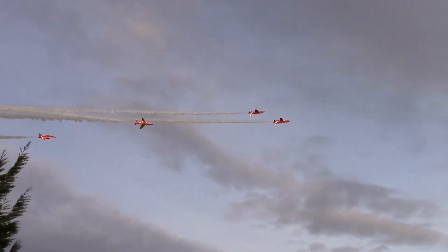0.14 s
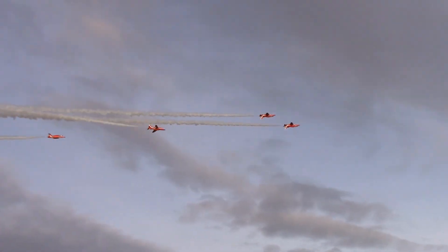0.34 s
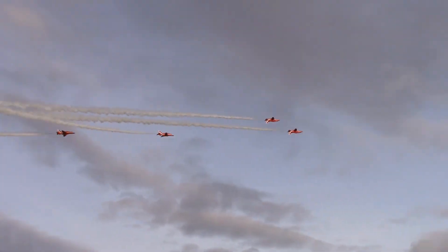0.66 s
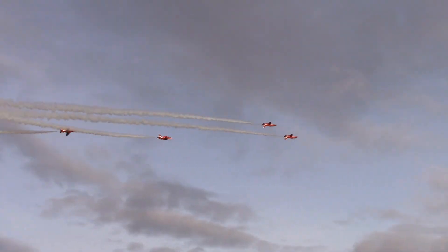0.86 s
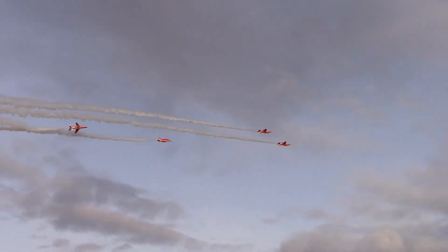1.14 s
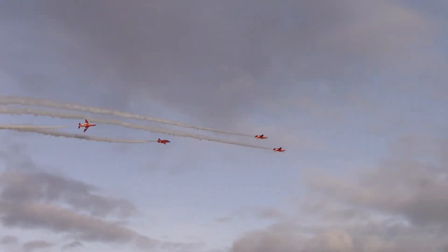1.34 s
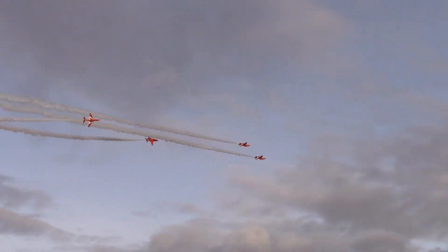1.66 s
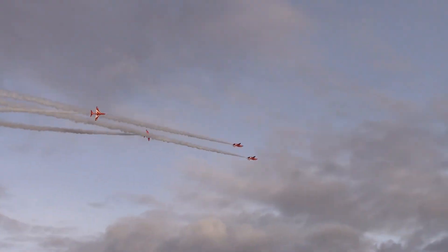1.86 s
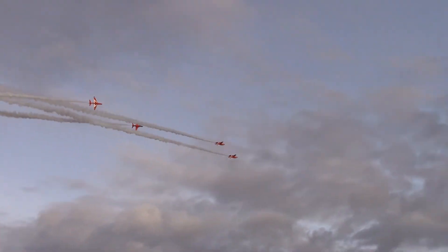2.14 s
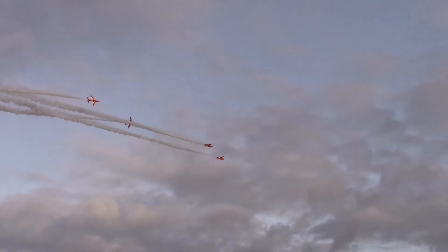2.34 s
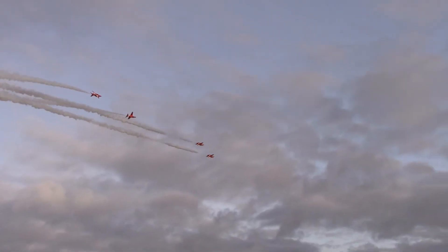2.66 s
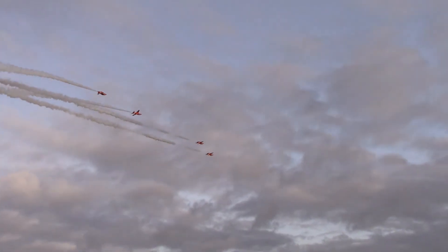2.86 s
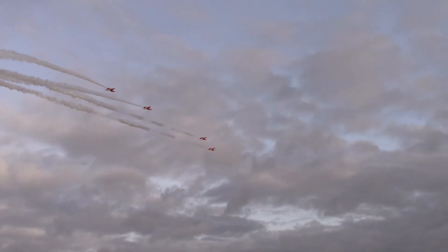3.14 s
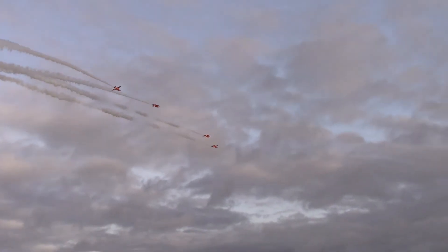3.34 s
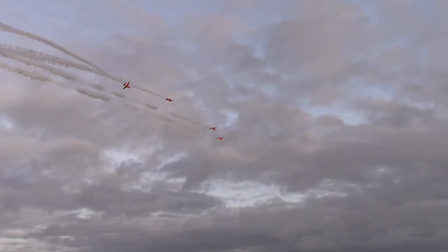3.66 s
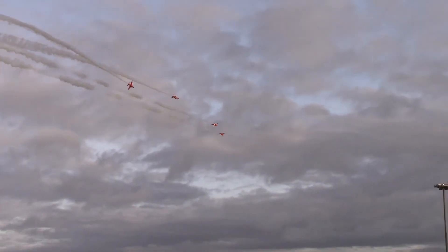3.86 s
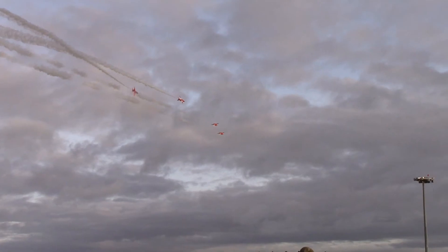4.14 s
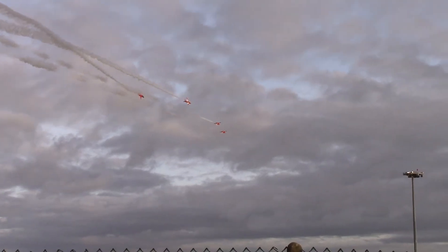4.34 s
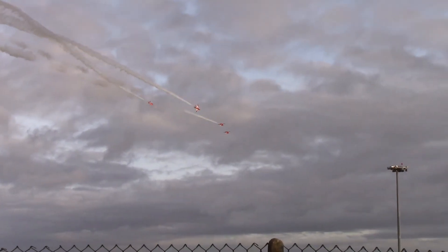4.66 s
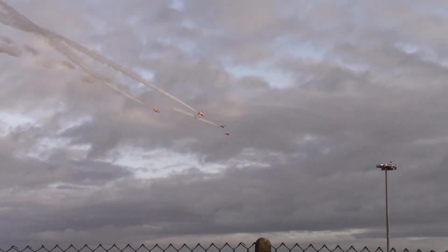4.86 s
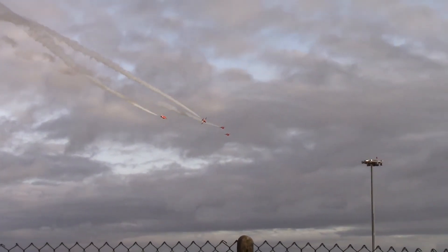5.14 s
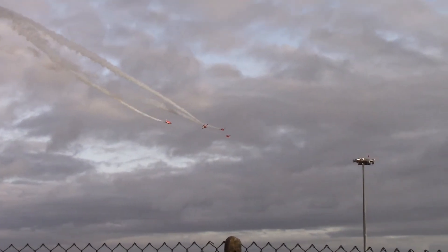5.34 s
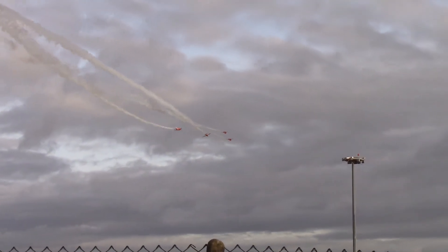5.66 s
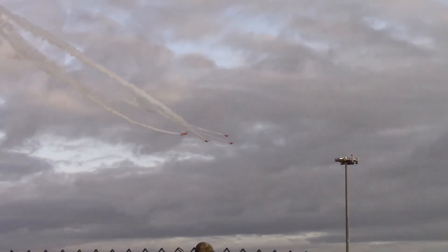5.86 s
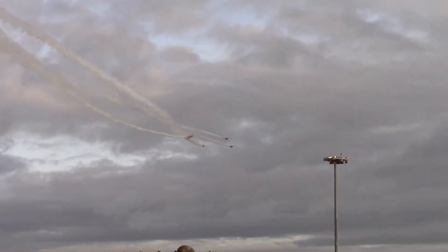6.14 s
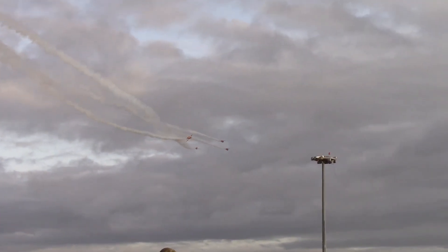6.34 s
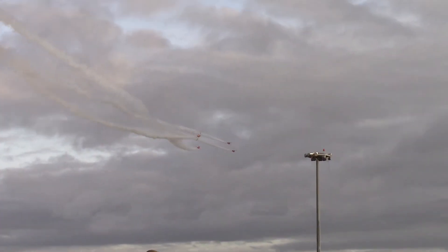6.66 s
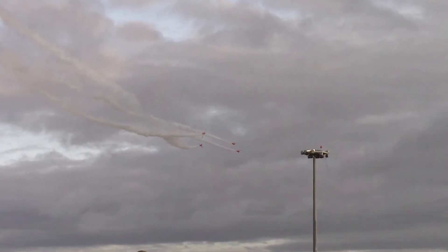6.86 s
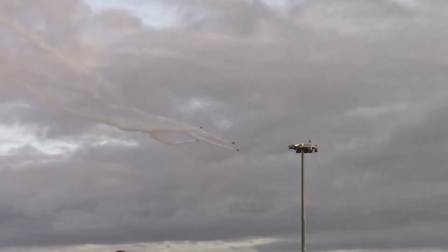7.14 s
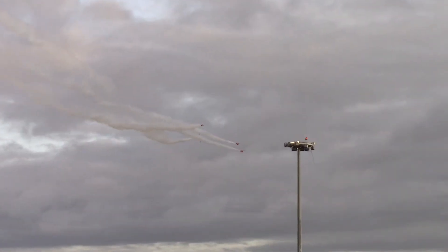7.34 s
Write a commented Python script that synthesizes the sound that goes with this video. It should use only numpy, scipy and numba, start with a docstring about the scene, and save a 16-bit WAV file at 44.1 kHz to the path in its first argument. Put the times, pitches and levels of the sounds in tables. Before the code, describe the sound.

Four small jets roar past in formation outdoors, a gritty tearing rush that swells unevenly, peaks early, then recedes with a hollow sweep.

```python
"""Four small jets in formation, heard as one exhaust roar, fly past low over open ground and recede. The roar
is noise in quarter-octave bands, with shocks, flickering as through turbulent air. A narrow band near 3.3 kHz
stands out of the hiss; faint delayed copies of the treble streak it. The ground returns an echo whose lag
shrinks overall, so the comb notches climb. A small microphone with little bass and a dull top picks it up, with
a grit that follows the upper mids."""
import sys
import numpy as np
from scipy import signal
from scipy.io import wavfile
from scipy.ndimage import uniform_filter1d, map_coordinates
from numba import njit

SR = 44100
rng = np.random.default_rng(int(sys.argv[2]) if len(sys.argv) > 2 else 0)


def master_out(mix):
    """Clip the mix to full scale and print it as 16-bit PCM to the path in sys.argv[1]."""
    frames = np.transpose(np.atleast_2d(mix))
    ceiling = np.clip(frames, -1, 1)
    pcm = np.round(ceiling * 32767).astype(np.int16)
    wavfile.write(sys.argv[1], SR, pcm)


N = 331000  # samples


def from_db(db):
    """Decibel law: amplitude gain of a level in dB."""
    return 10 ** (np.asarray(db) / 20)


def rms_one(x):
    """Normalisation of mean power: scaled to rms 1."""
    return x / np.sqrt(np.mean(x ** 2) + 1e-20)


def in_time(rows):
    """Linear interpolation: the columns of a curve table after t/s, sample by sample."""
    t, *columns = np.transpose(rows)
    return np.array([np.interp(np.arange(N) / SR, t, column) for column in columns])


def drift(rate_hz):
    """Low-passed random process: noise at every 40th sample through two equal one-poles, rms 1."""
    step = 40
    r = np.exp(-2 * np.pi * rate_hz * step / SR)
    noise = rng.standard_normal(N // step + 2002)
    slow = signal.lfilter([1], [1, -2 * r, r * r], noise)[2000:]  # drop the filter's start
    return np.interp(np.arange(N) / step, np.arange(len(slow)), rms_one(slow))


def pole_radius(width_hz):
    """Damping of a resonance: a wider band has poles further inside the unit circle."""
    return np.exp(-np.pi * width_hz / SR)


@njit
def moving_band(x, hz, r, sr):
    """Two-pole resonance of gain 1 at its centre, which follows hz."""
    y = np.zeros(len(x))
    for i in range(2, len(x)):
        drive = (1 - r * r) / 2 * (x[i] - x[i - 2])
        y[i] = drive + 2 * r * np.cos(2 * np.pi * hz[i] / sr) * y[i - 1] - r * r * y[i - 2]
    return y


# Ground reflection; depth is that of the hollow at the second notch before turbulence varies it.
# Columns: t/s, lag/ms, strength/1 (0-1), depth/1 (0-1)
GROUND_REFLECTION = [(0, 1.68, .3, .05), (1, 1.62, .3, .1), (1.6, 1.85, .3, .4), (2, 1.85, .35, .4),
                     (2.4, 1.62, .35, .2), (3, 1.56, .35, .15), (3.6, 1.5, .35, .25), (4.05, 1.32, .35, .5),
                     (4.25, 1.56, .45, .8), (4.42, 1.56, .45, .4), (4.62, 1.6, .5, .85), (5, 1.53, .5, .9),
                     (5.2, 1.47, .5, .7), (5.4, 1.28, .5, .85), (5.6, 1.25, .45, .95), (5.9, 1.24, .4, .7),
                     (6.2, 1.24, .35, .95), (6.6, 1.21, .3, .9), (6.8, 1.25, .25, .45), (7.5, 1.25, .2, .2)]
# Second, higher hollow in the roar, climbing overall as the jets sink.
# Columns: t/s, f/Hz, depth/1 (0-1)
HIGHER_HOLLOW = [(0, 1580, 0.2), (1, 1600, 0.3), (2, 1500, 0.3), (2.9, 1500, 0), (3.5, 1716, .4),
                 (4, 1844, 0.4), (4.3, 1754, .4), (4.75, 1700, 0.5), (5.2, 1775, .5), (5.45, 1900, .8),
                 (5.75, 1925, 0.6), (5.9, 2155, .2), (6.05, 2170, 0.6), (6.5, 2125, 0.3), (7.5, 2150, 0)]
ECHO_DULL_HZ = 1160
LATE_LAG_MS, LATE_STRENGTH = 3.2, 0.14
HOLLOW_WIDTH_HZ, UPPER_WIDTH_HZ = 90, 97


def ground_echo(x):
    """Interference of direct and reflected sound: a comb whose notches climb as the lag shrinks."""
    lag_ms, strength, depth = in_time(GROUND_REFLECTION)
    b, a = signal.butter(1, ECHO_DULL_HZ, fs=SR)
    dull = signal.filtfilt(b, a, x)  # rough grass scatters the highs
    arrival = np.arange(N) - lag_ms * SR / 1000
    first = map_coordinates(dull, [arrival], order=3, mode="mirror")
    late = np.roll(dull, round(LATE_LAG_MS * SR / 1000))  # subtracted: a weak inverted echo
    combed = (x + strength * first - LATE_STRENGTH * late) / np.sqrt(1 + strength ** 2)

    # turbulence fills the hollow now and then
    depth = np.clip(depth * (.68 + .4 * drift(5.)), 0, .98)
    # one and a half cycles of lag: the sharpest cancelling
    notch_hz = (1 + .012 * drift(2.5)) * 1500 / lag_ms
    for _ in range(2):  # twice over, for a dark floor
        combed = combed - depth * moving_band(combed, notch_hz, pole_radius(HOLLOW_WIDTH_HZ), SR)

    upper_hz, upper_depth = in_time(HIGHER_HOLLOW)
    upper = moving_band(combed, upper_hz, pole_radius(UPPER_WIDTH_HZ), SR)
    return combed - np.clip(upper_depth, 0, .95) * upper


STRAY_LAG_MS, STRAY_ABOVE_HZ = (2.9, 4.7, 7.3), 1800
STRAY_WANDER, STRAY_STRENGTH = .05, .13  # rms share of the lag; rms gain of each path


def stray_path(x):
    """Multipath refraction: treble by weak bent paths of wandering lag and strength streaks the hiss."""
    b, a = signal.butter(2, STRAY_ABOVE_HZ, "high", fs=SR)
    treble = signal.filtfilt(b, a, x)
    for lag_ms in STRAY_LAG_MS:
        lag = lag_ms * SR / 1000 * (1 + STRAY_WANDER * drift(1.))
        delayed = np.interp(np.arange(N) - lag, np.arange(N), treble)
        x = x + STRAY_STRENGTH * drift(3.) * delayed
    return x


# Narrow band near 3.3 kHz standing out of the hiss. Columns: t/s, level/dB (lift at its centre)
LIFTED_BAND = [(0, 4), (1.5, 2.5), (2.5, 2), (4, 3.5), (5.5, 2.5), (7.5, 4)]
LIFTED_HZ, LIFTED_WIDTH_HZ = 3270, 350


def lifted_band(x):
    """Resonant emphasis: lifts a narrow band of the hiss whose centre wanders."""
    centre_hz = LIFTED_HZ * (1 + 0.051 * drift(3.))
    band = moving_band(x, centre_hz, pole_radius(LIFTED_WIDTH_HZ), SR)
    return x + (from_db(in_time(LIFTED_BAND)[0]) - 1) * band


CRACKLES_PER_S = 60
CRACKLE_DB = 13.5  # smallest spike, over noise of rms 1


def crackle():
    """Poisson-like shock train: pressure spikes at random moments, of uneven size."""
    born = rng.random(N) < CRACKLES_PER_S / SR
    excess_db = 2.6 * np.minimum(rng.exponential(1, N), 4)
    return born * from_db(CRACKLE_DB + excess_db)


def eddies(spread_db, rate_hz, shocks):
    """Turbulent mixing noise: its strength jumps as large eddies burst, with lone shocks on it."""
    return rng.standard_normal(N) * from_db(spread_db * drift(rate_hz)) + shocks


# Momentary flares (+) and sags (-) of a stretch of the roar; widths are from centre to 1/e^2 of the dB.
# Columns: t/s, f/Hz (centre), width/octave, width/s, level/dB
BAND_FLARES = [(0.194, 4930, 0.46, 0.34, -7), (.52, 321, 0.33, 0.27, 4), (0.653, 3410, .2, 0.089, 6),
               (1.7, 3100, 0.11, 0.13, 4.5), (1.4, 2480, .2, 0.047, 2.5), (1.645, 260, 0.41, 0.16, 3),
               (1.77, 520, .5, .12, 2.5), (1.45, 420, .5, .2, -3), (3.75, 650, .5, .12, -2),
               (4.42, 650, .5, .15, -1.5), (5.1, 720, .5, .1, -1.5), (.8, 190, .6, 0.91, -2),
               (1.868, 640, .4, 0.041, 4), (2.345, 1100, 0.56, 0.09, 5), (2.77, 1500, .8, 0.12, 2),
               (2.578, 5050, 0.39, .1, 7), (2.682, 540, .3, 0.089, 3.5), (2.897, 4670, 0.22, 0.46, 5),
               (3.411, 1417, 0.39, 0.15, 5), (3.88, 1520, .25, .08, 6.5), (4.004, 291, .3, 0.11, 5),
               (4.5, 1515, .25, 0.1, 4), (4.575, 467, 0.27, 0.074, 4.5), (4.143, 450, 0.3, 0.13, 5.5),
               (4.734, 1400, .3, 0.099, 8), (4.76, 2230, 0.19, 0.035, 8), (5.225, 782, 0.25, .08, 9),
               (5.64, 249, .3, .06, 5), (4.68, 720, .4, .07, 2.5), (5.4, 2370, 0.092, 1.2, 2),
               (6.8, 299, .25, .12, 5.5), (6.844, 550, 0.26, 0.42, -11), (6.295, 570, 0.5, 0.08, 4.5),
               (5.6, 950, .5, .03, 4), (5.92, 720, .3, .07, 3.5), (6.782, 790, 0.37, 0.071, 7),
               (6.894, 281, 0.34, 0.15, 6.5), (6.1, 3400, 0.55, 0.9, 2.5), (1.7, 4000, .5, .15, 2.5),
               (1.55, 2300, .3, 0.092, 3.5), (3.58, 1800, 1.2, 0.11, -2.5), (1.59, 500, .4, .05, 3.5),
               (2.655, 560, .5, .04, 2.5), (6.8, 4860, 0.36, .7, -7), (7.2, 786, 0.28, 0.36, 2),
               (7.072, 810, 0.54, 0.063, 4), (7.21, 1980, 0.37, 0.054, 5.5), (7.239, 745, 0.32, 0.062, 4)]


def flares_db(hz):
    """Local spectral gain: the flares at one pitch, each a bell in time and in octaves."""
    coarse_s = np.arange(0, N, 100) / SR
    t, centre_hz, octaves, length_s, db = np.transpose(BAND_FLARES)[:, :, None]
    in_pitch = (np.log2(hz / centre_hz) / octaves) ** 2
    in_moment = ((coarse_s - t) / length_s) ** 2
    bells = db * np.exp(-2 * in_pitch - 2 * in_moment)
    return np.interp(np.arange(N) / SR, coarse_s, bells.sum(axis=0))


# The rumble, growing as the tailpipes turn toward the listener; only its changes against the roar count.
# Columns: t/s, level/dB
RUMBLE_CURVE = [(0.03, -58), (0.28, -55.5), (2.73, -42.5), (2.77, -45.5), (3.53, -39), (3.6, -44),
                (3.89, -37), (4.57, -42), (4.63, -35.5), (4.88, -33.5), (5.01, -45), (5.16, -37.5),
                (5.59, -44.5), (5.61, -41), (6.5, -36), (6.59, -41), (6.96, -32), (7.04, -40.5),
                (7.15, -34.5), (7.48, -36.5)]
# Upper half of the roar's body over its lower half; only departures from the mean count.
# Columns: t/s, level/dB
LEAN_CURVE = [(0, -1.5), (.8, -1), (1.301, -3), (1.7, -6), (2.1, -4), (2.45, -1.5), (2.7, -0.5), (3.1, -2),
              (3.45, 0.5), (3.9, -1), (4.3, -2.5), (4.701, 2), (5, 1), (5.298, 0), (5.701, -0.5), (6.1, 0),
              (6.5, -0.5), (6.85, -2.5), (7.15, 2.5), (7.352, -2), (7.5, 0)]
# Top edge of the hiss over the whole, worn away by the air; only departures from the mean count.
# Columns: t/s, level/dB
EDGE_CURVE = [(0, -12), (.8, -10), (1.35, -8), (1.8, -8.5), (2.301, -12), (2.6, -13.5), (3.1, -14),
              (3.651, -11), (4.1, -13), (4.9, -13.5), (5.701, -14.5), (6.5, -15.5), (7.5, -23)]
# How each pitch region answers the curves, and its drift as the jets recede.
# Columns: f/Hz, shares/1 of rumble, quick swells, brightness, lean and edge, drift/(dB/s)
REGION_ANSWERS = [(110, 1, .6, 0., 0., 0., 0.031), (199, 0.87, 0.44, -0.25, 0.41, 0.3, 0.28),
                  (273, 0.67, 0.43, 0.096, 0.56, -0.01, -0.21),
                  (350, 0.33, 0.57, -0.079, -0.69, -0.19, -0.035),
                  (520, 0.016, 0.97, -0.56, -0.12, 0.19, 0.23),
                  (760, 0.031, 0.78, -0.74, 0.92, 0.52, -0.066),
                  (1160, 0.14, 0.88, 0.82, 0.17, -0.31, 0.33), (1650, 0., 0.84, 0.32, 0.45, 0.099, 0.6),
                  (2350, 0.26, 1.2, 0.64, 0.25, 0.31, -.1), (3040, 0.044, 0.8, 0.58, 0.26, 0.65, -0.11),
                  (4040, 0., 0.6, 0.13, 0.21, 0.76, -.2), (5200, 0.01, 0.45, 0.42, 0.091, 0.99, -.4)]
SWELL_S = 1.7  # changes quicker than this count as swells


def spectral_balance(level_db, bright_db):
    """Time-varying spectrum: gives the function of pitch that says how a band departs from the roar."""
    rumble_db, lean_db, edge_db = [in_time(c)[0] for c in (RUMBLE_CURVE, LEAN_CURVE, EDGE_CURVE)]
    swell_db = level_db - uniform_filter1d(level_db, size=int(SWELL_S * SR), mode="nearest")
    rumble_over_db = rumble_db - level_db
    from_middle_s = (np.arange(N) - N / 2) / SR
    answer_hz, *answers = np.transpose(REGION_ANSWERS)

    def balance_db(hz):
        """Superposition in dB: the sum of the curves, each in this pitch's share."""
        at_hz = [np.interp(np.log(hz), np.log(answer_hz), a) for a in answers]
        rumble, swell, bright, lean, edge, drift_db_per_s = at_hz
        return (rumble * (rumble_over_db - rumble_over_db.mean())
                + (1 - rumble) * (swell - 1) * swell_db  # the whole roar already swells by 1
                + bright * (bright_db - bright_db.mean())
                + lean * (lean_db - lean_db.mean())
                + edge * (edge_db - edge_db.mean())
                + drift_db_per_s * from_middle_s)
    return balance_db


# The roar at the listener, swelling as the air bends it; of the brightness (treble over
# the whole) only departures from the mean count. Columns: t/s, level/dB, brightness/dB
ROAR_CURVE = [(0.03, -27.5, -0.5), (0.3, -32, -1), (0.53, -21, -1.5), (0.61, -27, -3), (0.71, -24.5, 0),
              (0.75, -29, -4.5), (0.8, -24, -4), (0.84, -28.5, -7), (0.9, -21, -1.5), (1.09, -26.5, -1),
              (1.17, -25, -5), (1.21, -26.5, -3), (1.34, -21.5, 1.5), (1.36, -23, -1.5), (1.63, -16, -4),
              (1.69, -13.5, -2.5), (1.79, -18.5, -1.5), (1.87, -14.5, -4.5), (1.94, -24.5, -1.5),
              (2.02, -15.5, -3), (2.15, -22.5, -4), (2.35, -14, -6.5), (2.52, -22, 1.5), (2.6, -21.5, -1),
              (2.66, -14.5, -5.5), (2.69, -16, -0.5), (2.73, -16, -0.5), (2.77, -16.5, -1.5),
              (2.87, -18.5, -6), (2.89, -20.5, -4.5), (3.16, -17, -6), (3.2, -22, -5.5),
              (3.43, -17.5, -3.5), (3.53, -26.5, -5.5), (3.7, -23.5, 0), (3.93, -22, -7), (4.55, -24.5, -3),
              (4.6, -20, -7.5), (4.63, -21, 2), (4.65, -16.5, -8.5), (4.72, -16, -6), (4.74, -20.5, -3),
              (4.95, -22.5, -5), (5.18, -24, 1), (5.22, -22.5, -3.5), (5.4, -28.5, -5), (5.55, -24, -4.5),
              (5.63, -27.5, -1), (5.86, -31, -5), (5.9, -28, -7), (6.15, -30.5, -3), (6.21, -27.5, -4),
              (6.25, -30, -7), (6.3, -27.5, -10.5), (6.36, -30, -3.5), (6.71, -31, -6), (6.77, -28.5, -5.5),
              (6.94, -30, -10), (7.03, -27, -6.5), (7.09, -27.5, -7), (7.16, -31.5, -9), (7.23, -29, -8.5),
              (7.33, -33.5, -5), (7.48, -30.5, -9.5)]
# Jet noise spectrum. Columns: f/Hz, level/dB (per Hz)
JET_SPECTRUM = [(100, -20), (190, -9), (250, -4), (330, -1), (430, 0.5), (530, 0), (630, -1.5), (750, -3),
                (950, -3.5), (1200, -6.5), (1700, -8.5), (2400, -9.5), (3200, -12.5), (3900, -14),
                (5000, -16), (6500, -30)]
SMOOTH_BELOW_HZ = 700  # the low roar does not crackle
MIC_MAKEUP_DB = 2  # what the microphone's slopes take from the roar


def jets(shared_db, own_db):
    """Broadband jet noise in quarter-octave bands; turbulence flickers them partly together, partly alone."""
    level_db, bright_db = in_time(ROAR_CURVE)
    balance_db = spectral_balance(level_db, bright_db)
    colour_hz, colour_db = np.transpose(JET_SPECTRUM)
    shocks = crackle()
    # two of each, so that neighbouring bands get different noise
    rough = [eddies(0.9, rate_hz=110.0, shocks=shocks), eddies(1.05, rate_hz=120.0, shocks=shocks)]
    smooth = rng.standard_normal((2, N))
    together = drift(12.)
    edges_hz = 50 * 2 ** np.arange(0, 7.1, 1 / 4)
    roar = 0
    for k, (low, high) in enumerate(zip(edges_hz, edges_hz[1:])):
        hz = np.sqrt(low * high)
        source = rough if hz > SMOOTH_BELOW_HZ else smooth
        band_pass = signal.butter(2, [low, high], "band", fs=SR, output="sos")
        band = signal.sosfilt(band_pass, source[k % 2])
        alone = np.clip(hz / 500, .3, 1) * drift(14.7)  # the bass flickers less
        flicker_db = shared_db * together + own_db * alone
        spectrum_db = np.interp(np.log(hz), np.log(colour_hz), colour_db)
        roar = roar + from_db(spectrum_db + balance_db(hz) + flicker_db + flares_db(hz)) * band
    heard = ground_echo(stray_path(lifted_band(roar)))
    return from_db(level_db + MIC_MAKEUP_DB) * rms_one(heard)


def scene():
    """Free-field roar of the formation with its ground reflection, in one channel."""
    return jets(shared_db=0.52, own_db=1.4)[None]


MIC_LOW_HZ, MIC_HIGH_HZ, CUTOFF_HZ = 162, 3320, 8000
GRIT_DB, GRIT_FOLLOWS_HZ = -17.5, 2460  # gain of the grit noise; the level above this pitch drives it


def record(dry):
    """Band-limited transduction: bass and top drop, a grit rides on the upper mids, the top is cut."""
    low_cut = signal.butter(4, MIC_LOW_HZ, "high", fs=SR, output="sos")
    high_slope = signal.butter(5, MIC_HIGH_HZ, fs=SR, output="sos")
    heard = signal.sosfilt(high_slope, signal.sosfilt(low_cut, dry))

    follow = signal.butter(1, GRIT_FOLLOWS_HZ, "high", fs=SR, output="sos")
    bright = signal.sosfilt(follow, heard)
    level = np.sqrt(uniform_filter1d(bright ** 2, size=300) + 1e-12)
    grit = signal.lfilter([1], [1, -.3], rng.standard_normal(dry.shape))
    grit = signal.sosfilt(signal.butter(8, 7600, fs=SR, output="sos"), grit)

    steep_cut = signal.ellip(10, .5, 60, CUTOFF_HZ, fs=SR, output="sos")
    return signal.sosfilt(steep_cut, heard + from_db(GRIT_DB) * level * grit)


dry = scene()
out = record(dry)
master_out(out)
```